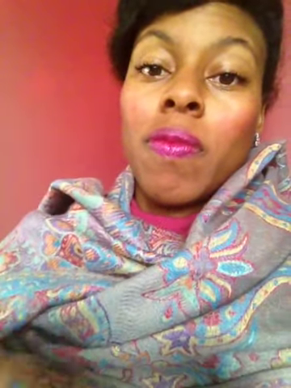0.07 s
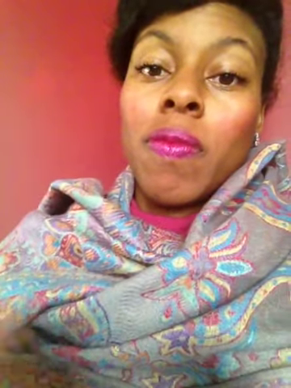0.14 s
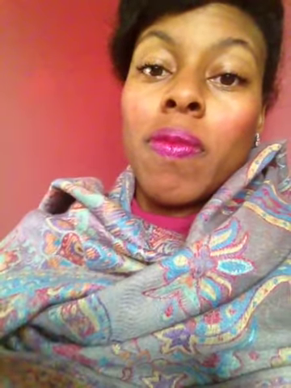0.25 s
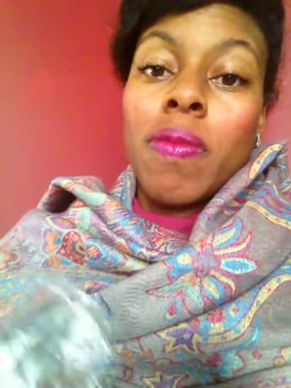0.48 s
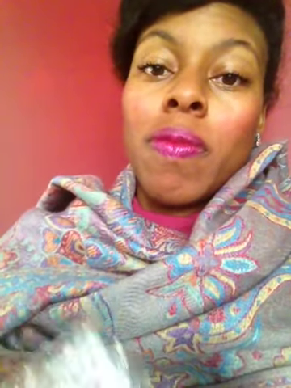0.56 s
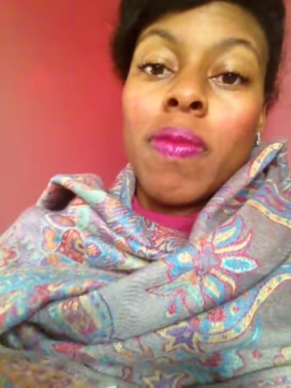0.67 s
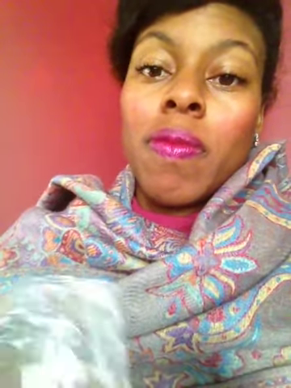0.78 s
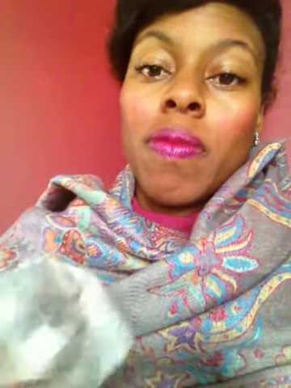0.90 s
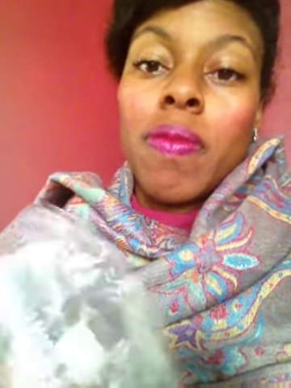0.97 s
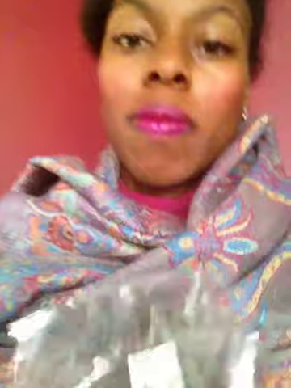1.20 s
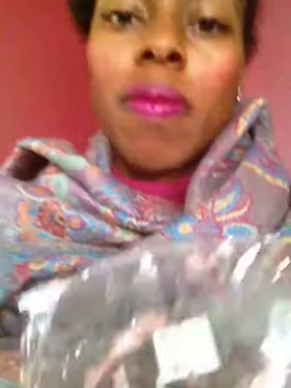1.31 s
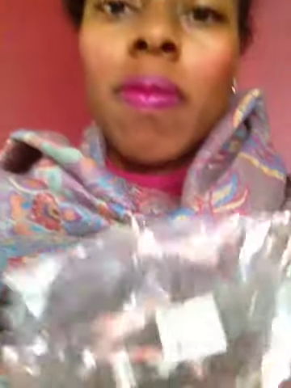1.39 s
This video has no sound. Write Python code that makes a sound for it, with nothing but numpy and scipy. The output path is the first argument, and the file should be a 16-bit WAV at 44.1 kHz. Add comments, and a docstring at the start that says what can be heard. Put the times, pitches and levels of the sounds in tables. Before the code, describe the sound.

Stiff plastic packaging crackles and snaps as hands turn it in a small room, then falls quiet

```python
"""A stiff, shiny plastic bag is lifted and turned close to a microphone in a small, live room with a faint hum.
It opens on a soft swish of sliding film (shaped noise) and a fine crackle (random grains) that follows the hands.
Creases snap one by one (kicked resonances), slack panels flap dully, and early on a whole fold collapses (a dense
burst of grains). The hardest snaps come after about a second; then the hands stop, a few late creases tick,
and the room (decaying bands of noise) rings out."""
import sys
import numpy as np
from scipy import signal
from scipy.fft import rfft, irfft
from scipy.io import wavfile

SR = 44100
rng = np.random.default_rng(int(sys.argv[2]) if len(sys.argv) > 2 else 0)


def output_pcm(signal):
    """Save a mono or channel-first signal as 16-bit PCM at the path in sys.argv[1].

    Samples are clipped to [-1, 1] before scaling.
    """
    pcm = np.clip(np.atleast_2d(signal).T, -1, 1) * 32767
    wavfile.write(sys.argv[1], SR, np.round(pcm).astype(np.int16))


N = 63945  # length in samples

# Steady room tone, spectral shape: [f/Hz, relative level/dB]
AIR_SPECTRUM = [(25, -11), (80, -18), (110, -10), (145, 9), (190, 2.5), (350, -3), (600, -2.5),
                (1200, -22.5), (5000, -18), (15000, -22)]
AIR_DB, HUM_HZ, HUM_DB = -67, 119.5, -73.5

# Ring of the room: [f/Hz, decay time by 60 dB t/s, relative level/dB]
ROOM_RING = [(202, 0.47, 7), (820, 0.38, 0.), (2520, 0.57, -2), (6040, 0.45, -0.5), (14000, 0.28, 4)]
ROOM_GAP_S = 0.0034  # silence before the ring
SNAP_WET_DB, CRACKLE_WET_DB, FOLD_WET_DB = -11, -5.5, -2  # sends into the room
WALL_ECHO_S, WALL_ECHO_DB = 0.0072, -21

# Sliding of the bag: [t/s, level/dB]
SLIDE_LEVEL = [(0, -55), (.05, -56.5), (.15, -54), (.27, -55), (.32, -55), (.45, -52.5), (.6, -59),
               (.7, -72.5)]
# Swish of sliding film, spectral shape: [f/Hz, relative level/dB]
SWISH_SPECTRUM = [(200, -15), (1000, -7), (1900, -2), (3300, -1.5), (4600, 0), (6000, -6), (9000, -6.5),
                  (15000, -11)]

# Squeeze of the hands: [t/s, fine crackle level/dB, low rustle level/dB]
SQUEEZE_LEVELS = [(0, -53, -53), (0.038, -60.5, -66.5), (.14, -55.5, -59.5), (.26, -61, -62.5),
                  (.335, -47.5, -61.5), (.375, -47.5, -59.5), (.46, -48.5, -68), (0.519, -41.5, -48.5),
                  (.57, -60.5, -63), (0.692, -70, -63), (0.721, -44.5, -47), (.765, -43.5, -55),
                  (.81, -53.5, -71), (.84, -44.5, -52), (.89, -62, -60), (.925, -42, -47),
                  (.96, -48.5, -60), (1.012, -41.5, -46), (1.05, -51, -51.5), (1.07, -43, -53),
                  (1.09, -45.5, -49.5), (1.141, -42.5, -49.5), (1.175, -58, -63), (1.22, -64, -87),
                  (1.45, -99, -81)]
# Fine crackle of the film, spectral shape: [f/Hz, relative level/dB]
FILM_SPECTRUM = [(300, -22), (1000, -4.5), (1900, -3.5), (3000, -1.5), (4800, 3.5), (5800, -2.5),
                 (8000, 0.5), (11000, -1.5), (15000, -10)]
# Low rustle of the sheet, spectral shape: [f/Hz, relative level/dB]
SHEET_SPECTRUM = [(70, -38), (160, -9), (300, -2.5), (700, 0.5), (1050, -3.5), (1900, -1), (2600, -0.5),
                  (4000, -11.5), (9000, -23.5)]
CRACKLES_PER_S, CRACKLE_SPREAD_DB, CRACKLE_RING_S = 650, 4.5, 0.00066
RUSTLES_PER_S, RUSTLE_SPREAD_DB, RUSTLE_RING_S = 700, 4.5, 0.00088

# Collapsing fold, spectral shape: [f/Hz, relative level/dB]
FOLD_SPECTRUM = [(80, -36), (180, -8), (700, -3), (1150, 1.5), (1500, -0.5), (1900, 4.5), (3000, -6),
                 (3800, 2), (5700, -6.5), (9000, -3), (15000, -12)]
FOLD_S, FOLD_DB = 0.3435, -31.5
FOLD_ATTACK_S, FOLD_HOLD_S, FOLD_DECAY_S = 0.0051, 0.0084, 0.0054

# Slack panels that flap: [t/s, f/Hz, level/dB]
PANEL_FLAPS = [(.013, 580, -28.5), (.148, 1380, -23.5), (.486, 188, -25.5), (.604, 299, -30),
               (.764, 557, -22), (.943, 617, -21), (1.022, 447, -18), (1.116, 360, -21.5),
               (1.151, 955, -18.5), (1.366, 380, -32)]
FLAP_RING_S, FLAP_Q, FLAP_FLUTTER = 0.0031, 1.24, 0.21

# Creases that snap: [t/s, crack level/dB, crack f/Hz, knock level/dB, knock f/Hz], levels before the trims
CREASE_SNAPS = [(0.0619, -29, 10100, -23, 3400), (0.094, -25, 6000, -24, 2000),
                (0.106, -24, 6000, -25.5, 2800), (0.1578, -20.5, 11500, -20, 3800),
                (0.201, -30, 5370, -26, 2200), (0.2087, -21.5, 8050, -20.5, 2000),
                (0.2125, -18, 10400, -18.5, 3200), (0.2863, -9.5, 7900, -18, 2000),
                (0.3546, -14.5, 9700, -9.5, 1600), (0.3855, -18, 7460, -18, 2800),
                (0.4056, -12, 8100, -16, 2200), (0.4336, -27, 6060, -19, 3000),
                (0.4389, -28, 11700, -18, 3400), (0.4941, -38, 6240, -19, 4400),
                (0.512, -33, 9500, -18, 3600), (0.5267, -17.5, 6300, -20, 2600),
                (0.5644, -34, 11400, -24.5, 2600), (0.5799, -19, 4500, -20.5, 2600),
                (0.6029, -22.5, 6230, -20, 2200), (0.6824, -28.5, 7700, -33, 2000),
                (0.7094, -30, 9900, -31, 2400), (0.7155, -27, 8500, -22.5, 2000),
                (0.7233, -10, 10600, -21, 3000), (0.7474, -12, 8900, -16.5, 1600),
                (0.7953, -15, 11500, -16.5, 2800), (0.8313, -22.5, 5040, -24, 2000),
                (0.8579, -15.5, 11700, -23.5, 4400), (0.8627, -27, 7200, -30, 2200),
                (0.8972, -16.5, 8200, -36, 2000), (0.9045, -15, 8250, -21.5, 1400),
                (0.913, -12, 8840, -35, 1600), (0.9235, -9.5, 7900, -35, 1600),
                (0.933, -20, 6430, -25, 3000), (0.9387, -10.5, 6750, -11, 4270),
                (0.9435, -22, 9000, -23, 2500), (0.9693, -22, 7800, -21, 4000),
                (0.9762, -14.5, 8100, -42, 2200), (1, -15, 7800, -26, 2000),
                (1.0169, -4.5, 7900, -10.5, 2800), (1.0212, -1.5, 8000, -18, 1400),
                (1.0238, -30, 9600, -15.5, 4400), (1.0397, -18, 7800, -35, 2400),
                (1.0678, -29, 5000, -15, 2600), (1.072, -19, 4730, -23, 1600),
                (1.1307, -15, 8600, -20, 3800), (1.1401, -18.5, 6440, -24, 1400),
                (1.1454, -16, 12300, -31, 1400), (1.1735, -22, 10600, -37, 1400),
                (1.2378, -39, 4700, -27.5, 1700), (1.2667, -31, 7800, -46, 4000),
                (1.3133, -28, 4050, -25.5, 2700), (1.3948, -42, 12300, -44, 4200),
                (1.4002, -45, 4500, -37, 1650)]
CRACK_RING_S, CRACK_Q, CRACK_FLUTTER, CRACK_TRIM_DB = 0.00068, 2.85, 0.38, 0.5
KNOCK_RING_S, KNOCK_Q, KNOCK_FLUTTER, KNOCK_TRIM_DB = 0.00074, 1.57, 0.21, 1

LOW_CUT_HZ, TOP_HZ = 94, 15300


def undb(db):
    """Decibels to gain."""
    return 10 ** (np.asarray(db) / 20)


def unit(x):
    """Scale to an energy of one."""
    return x / np.sqrt(np.sum(x ** 2) + 1e-18)


def over_hz(hz, points, values):
    """Join points by straight lines on a log-frequency axis."""
    return np.interp(np.log(hz + 1), np.log(points), values)


def follow(t, table):
    """Level curve over time, straight lines in decibels, returned as gain."""
    times, levels_db = np.array(table).T
    return undb(np.interp(t, times, levels_db))


def colour(x, spectrum, size=2048):
    """Causal, minimum-phase filter with the given spectral shape and unit power gain."""
    points, levels_db = np.array(spectrum).T
    gain = undb(over_hz(np.fft.rfftfreq(size, 1 / SR), points, levels_db))
    # Folding the cepstrum forward puts the energy as early as possible
    cepstrum = irfft(np.log(gain))
    cepstrum[1:size // 2] *= 2
    cepstrum[size // 2 + 1:] = 0
    impulse = unit(irfft(np.exp(rfft(cepstrum))))
    return signal.fftconvolve(x, impulse)[:len(x)]


def resonate(x, hz, q):
    """One broad resonance."""
    hz = min(hz, SR / 2 - 1)
    b, a = signal.iirpeak(hz, max(q, 1), fs=SR)
    return signal.lfilter(b, a, x)


def add(out, start, sound):
    """Mix a sound in at a time in seconds."""
    i = int(np.clip(start * SR, 0, N - 1))
    out[i:i + len(sound)] += sound[:N - i]


def buckle(ring_s, flutter, size=1024):
    """Film jumps to a new shape: one kick, then a quickly dying flutter."""
    push = flutter * rng.standard_normal(size) * np.exp(-np.arange(size) / SR / ring_s)
    push[0] = 1
    return push


def grains(per_s, spread_db, ring_s, count=6000, size=128):
    """Tiny bucklings at random moments, many weak and a few strong, scaled to an rms of one."""
    starts = np.cumsum(rng.exponential(1, count)) / per_s
    strengths = undb(spread_db * np.minimum(rng.exponential(1, count), 3))
    shapes = rng.standard_normal((count, size)) * np.exp(-np.arange(size) / SR / ring_s)
    out = np.zeros(N)
    for start, strength, shape in zip(starts[starts < N / SR], strengths, shapes):
        add(out, start, strength * shape)
    return unit(out) * np.sqrt(N)


def room_tone(t):
    """Faint steady air noise and mains hum."""
    air = undb(AIR_DB) * colour(rng.standard_normal(N), AIR_SPECTRUM)
    hum = undb(HUM_DB) * np.sqrt(2) * np.sin(2 * np.pi * HUM_HZ * t)
    return air + hum


def room(x, count=10):
    """Diffuse ring of the room: octave bands of noise, each with its own level and decay."""
    t, hz = np.arange(N) / SR, np.fft.rfftfreq(N, 1 / SR)
    points, t60s, levels_db = np.array(ROOM_RING).T
    noise = rfft(rng.standard_normal(N))
    tail = np.zeros(N)
    for centre in SR / 2 / 2 ** (np.arange(count) + 0.5):
        in_band = abs(np.log2((hz + 1) / centre)) < 0.5
        band = irfft(noise * in_band, N)
        decay = np.exp(-np.log(1000) * t / over_hz(centre, points, t60s))
        tail += undb(over_hz(centre, points, levels_db)) * band * decay
    return signal.fftconvolve(x, unit(tail * (t > ROOM_GAP_S)))[:N]


def slide(t):
    """Film sliding as the bag is lifted makes a soft swish of smooth noise."""
    return follow(t, SLIDE_LEVEL) * colour(rng.standard_normal(N), SWISH_SPECTRUM)


def crackle(t):
    """Fine wrinkles crackle and the sheet rustles as hard as the hands squeeze."""
    squeeze = np.array(SQUEEZE_LEVELS)
    fine = grains(CRACKLES_PER_S, CRACKLE_SPREAD_DB, CRACKLE_RING_S) * follow(t, squeeze[:, [0, 1]])
    low = grains(RUSTLES_PER_S, RUSTLE_SPREAD_DB, RUSTLE_RING_S) * follow(t, squeeze[:, [0, 2]])
    return colour(fine, FILM_SPECTRUM) + colour(low, SHEET_SPECTRUM)


def fold(t):
    """A whole fold gives way in a brief avalanche of bucklings."""
    age = t - FOLD_S
    attack = np.clip(age / FOLD_ATTACK_S, 0, 1)
    decay = np.exp(-np.maximum(age - FOLD_ATTACK_S - FOLD_HOLD_S, 0) / FOLD_DECAY_S)
    avalanche = attack * decay * grains(per_s=3500, spread_db=3.5, ring_s=0.00072)
    return undb(FOLD_DB) * colour(avalanche, FOLD_SPECTRUM)


def flaps():
    """Larger panels flip over with a dull, short pop."""
    out = np.zeros(N)
    for start, hz, db in PANEL_FLAPS:
        pop = unit(resonate(buckle(FLAP_RING_S, FLAP_FLUTTER), hz, FLAP_Q))
        add(out, start, undb(db) * pop)
    return out


def snaps():
    """Each crease gives a bright crack, and the facet of film next to it a lower knock."""
    out = np.zeros(N)
    for start, crack_db, crack_hz, knock_db, knock_hz in CREASE_SNAPS:
        crack = unit(resonate(buckle(CRACK_RING_S, CRACK_FLUTTER), crack_hz, CRACK_Q))
        knock = unit(resonate(buckle(KNOCK_RING_S, KNOCK_FLUTTER), knock_hz, KNOCK_Q))
        snap = undb(crack_db + CRACK_TRIM_DB) * crack + undb(knock_db + KNOCK_TRIM_DB) * knock
        add(out, start, rng.choice([-1, 1]) * snap)  # film jumps inward or outward
    return out


def scene():
    """The bag, a near wall and the room, heard by one microphone on both channels."""
    t = np.arange(N) / SR
    fine = slide(t) + crackle(t)
    collapse = fold(t)
    sharp = flaps() + snaps()
    direct = sharp + fine + collapse
    send = undb(SNAP_WET_DB) * sharp + undb(CRACKLE_WET_DB) * fine + undb(FOLD_WET_DB) * collapse
    echo = room(send)
    add(echo, WALL_ECHO_S, undb(WALL_ECHO_DB) * direct)
    return np.tile(direct + echo + room_tone(t), (2, 1))


def record(dry):
    """The microphone loses the deep bass and the recorder cuts the top steeply."""
    low_cut = signal.butter(2, LOW_CUT_HZ, "high", fs=SR, output="sos")
    top_cut = signal.ellip(8, 0.2, 70, TOP_HZ, fs=SR, output="sos")  # 0.2 dB ripple, 70 dB stop
    return signal.sosfilt(top_cut, signal.sosfilt(low_cut, dry))


dry = scene()
out = record(dry)
output_pcm(out)
```